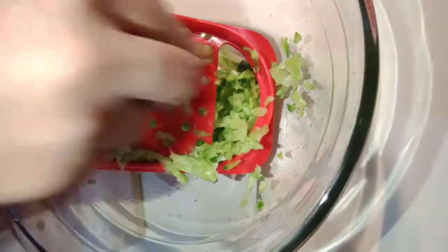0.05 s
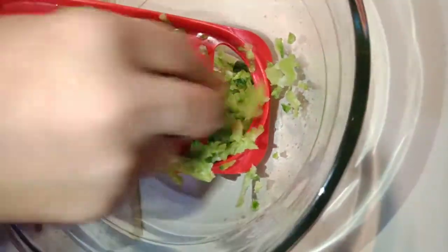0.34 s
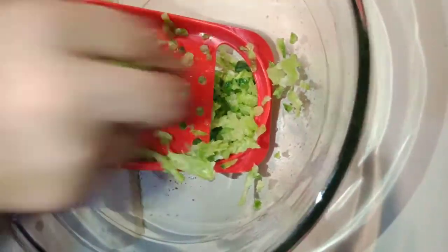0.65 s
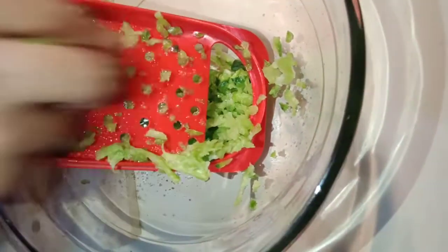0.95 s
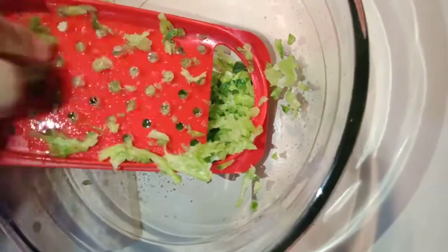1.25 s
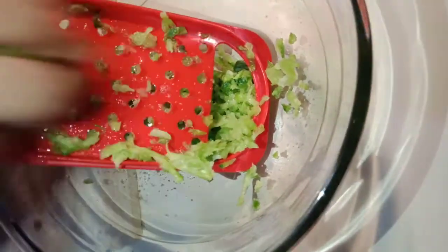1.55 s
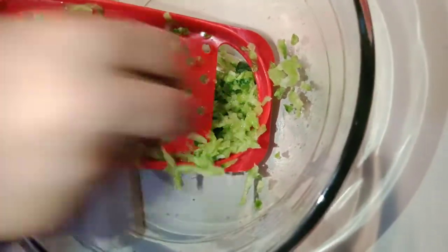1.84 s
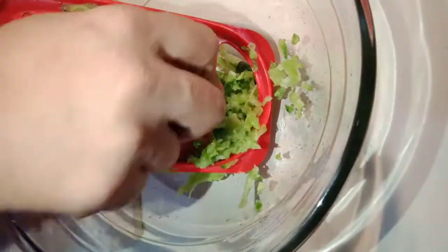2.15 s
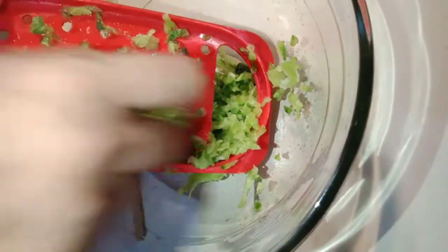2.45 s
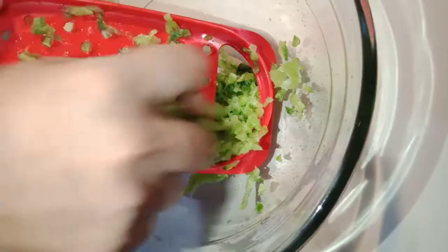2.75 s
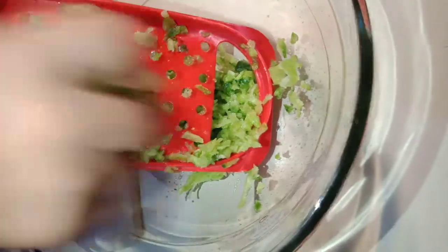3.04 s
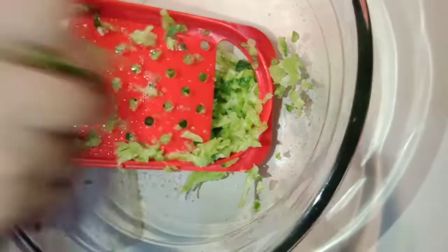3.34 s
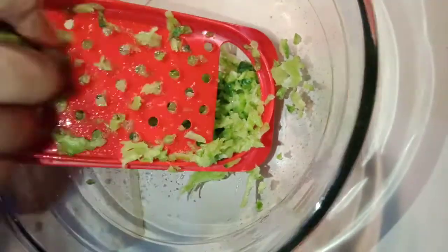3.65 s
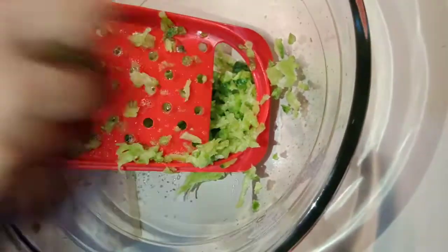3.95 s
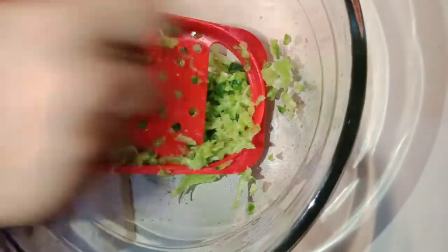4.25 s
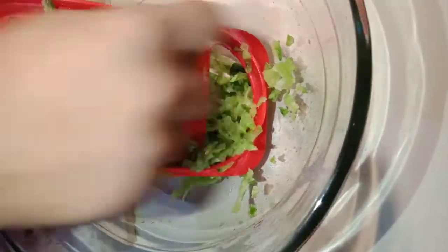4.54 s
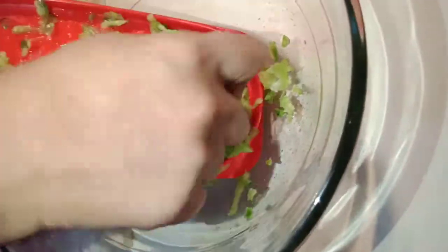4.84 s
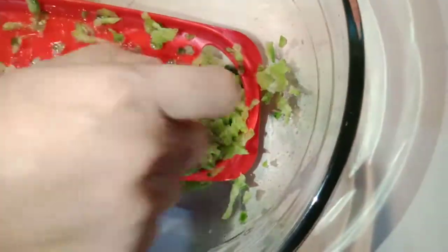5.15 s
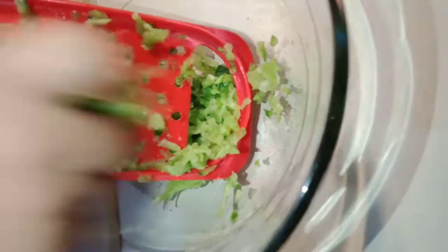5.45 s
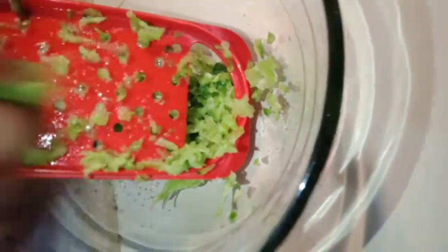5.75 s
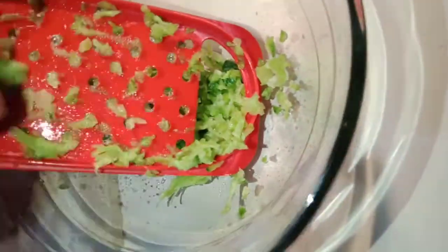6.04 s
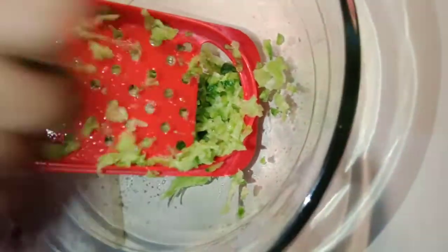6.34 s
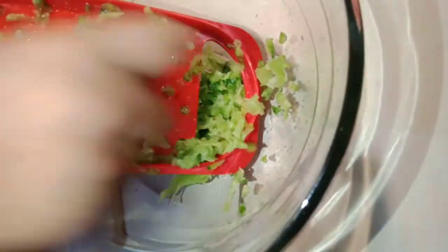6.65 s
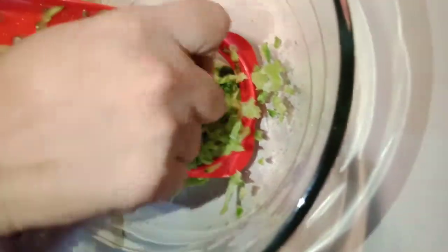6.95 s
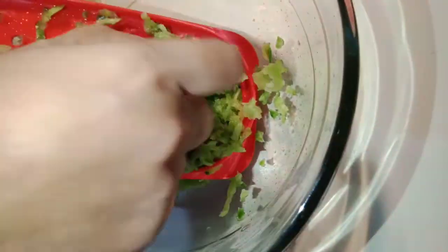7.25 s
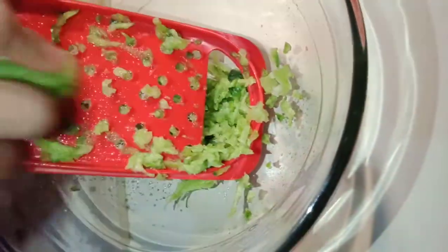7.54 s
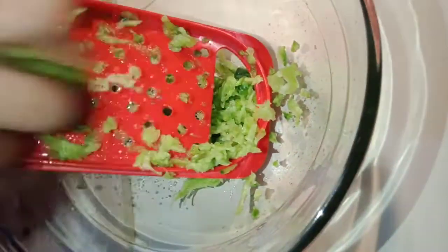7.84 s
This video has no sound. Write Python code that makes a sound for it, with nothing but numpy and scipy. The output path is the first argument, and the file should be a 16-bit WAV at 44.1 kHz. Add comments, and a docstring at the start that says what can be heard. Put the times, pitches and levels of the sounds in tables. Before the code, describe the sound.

A firm vegetable is grated by hand on a coarse plastic grater, about three short strokes a second. Each stroke is a crunchy rasp with a low thud, small snaps and a juicy crackle, followed by a faint wet rub. The grater often clacks against a glass bowl, which rings briefly. The rhythm breaks for three short pauses. The sound is close, in a quiet kitchen.

```python
"""Grating a bitter gourd

A coarse plastic grater lies across a glass bowl in a kitchen. On each push its teeth tear the
flesh in dense, uneven snaps: the plate rasps, thuds in its low bending modes, and juice crackles.
As the gourd is set down again the grater often knocks on the bowl, which rings briefly.
The way back is a faint wet rub."""
import sys
import numpy as np
from scipy import signal
from scipy.fft import rfft, irfft
from scipy.io import wavfile
from scipy.ndimage import uniform_filter1d

SR = 44100
rng = np.random.default_rng(int(sys.argv[2]) if len(sys.argv) > 2 else 0)


def inscribe(sig):
    """Save sig as 16-bit PCM at rate SR to the path in sys.argv[1].

    A 1-D sig is mono; a 2-D sig holds one channel per row.
    Samples are clipped to [-1, 1] before scaling.
    """
    pcm = np.round(np.clip(np.atleast_2d(sig).T, -1, 1) * 32767)
    wavfile.write(sys.argv[1], SR, pcm.astype(np.int16))


N = 353234

# Event levels are relative; each layer adds its own gain.
# pushes across the teeth: start_s, length_s, crest_fraction, rasp_db, crunch_db, thud_db, slide_db
PUSHES = [(-0.116, 0.13, 0.62, -27.0, -28, -22, -55.5), (0.243, 0.14, 0.62, -27.0, -29, -21.0, -46),
          (0.589, 0.14, 0.61, -27.5, -30, -21.0, -48.5), (0.938, 0.12, 0.82, -27.5, -30.0, -23, -48),
          (1.296, 0.139, 0.64, -27.5, -30.5, -20, -48), (1.659, 0.13, 0.59, -26.5, -28.5, -21, -52),
          (1.998, 0.141, 0.4, -27.5, -28.5, -22.5, -41), (2.642, 0.15, 0.51, -29.0, -32, -27, -50.5),
          (3.001, 0.14, 0.58, -27.0, -28.0, -22.5, -52.5), (3.349, 0.14, 0.51, -28, -29, -21, -55.5),
          (3.7, 0.14, 0.6, -29, -32, -26.5, -46), (4.048, 0.13, 0.63, -27.5, -29.5, -23.5, -46),
          (4.393, 0.12, 0.47, -30.0, -29.5, -24.0, -49.5), (4.74, 0.11, 0.59, -26.0, -26.0, -22, -40.5),
          (5.4, 0.14, 0.54, -31.0, -33.0, -28, -45), (5.773, 0.12, 0.5, -29.0, -27.0, -22, -47),
          (6.111, 0.14, 0.57, -29, -28.5, -22.5, -52.5), (6.463, 0.14, 0.65, -29.5, -29.5, -22, -45.5),
          (6.804, 0.12, 0.41, -29, -28.0, -22, -48.5), (7.592, 0.14, 0.4, -35.5, -37, -33.5, -48.5),
          (7.96, 0.12, 0.54, -31, -32.0, -22, -50.0)]
# grater hits bowl: start_s, level_db, clack_offset_db, hardness_db_per_octave
KNOCKS = [(0.12, -34, 6, -3), (1.288, -20, 1.5, -11), (1.634, -20, 7.5, 6), (1.639, -3.5, -4, 0),
          (1.978, -21.5, 3.5, -3), (2.613, -30.5, 4.5, -2), (2.63, -21, 2.5, -2), (2.977, -16.5, -1, -1),
          (2.982, -9.5, -0.5, 0.5), (3.324, -5.5, -2.5, -1.5), (3.677, -8.5, -3.5, -3),
          (3.679, -7.5, 2.5, 3), (4.012, -28, 4.5, 2), (4.697, -32.5, 1.5, -4), (5.363, -21.5, 3.5, 2.5),
          (5.732, -31, 8, 3), (6.084, -18, 4.5, 3.5), (6.425, -27, 9.5, 14), (6.429, -18, 4, 4),
          (6.783, -14, 1, 3), (7.539, -17, 0, -1.5), (7.91, -17.5, 2, -1)]
# light touches between pushes: start_s, length_s, level_db
BRUSHES = [(0.202, 0.042, -49.5), (0.536, 0.031, -47.5), (0.899, 0.036, -49), (1.136, 0.027, -50.5),
           (2.38, 0.058, -53), (4.34, 0.025, -54.0), (4.677, 0.036, -50.5), (5.006, 0.04, -52.5),
           (5.106, 0.064, -53.5), (5.698, 0.047, -43.5), (7.026, 0.075, -51), (7.279, 0.039, -49),
           (7.47, 0.048, -44), (7.549, 0.048, -55), (7.876, 0.11, -49)]
# tough ridges break: start_s, level_db
SNAPS = [(0.256, -11.5), (0.337, -11), (0.586, -14.5), (0.671, -11), (0.979, -13), (1.02, -11),
         (1.373, -14), (1.682, -6), (1.754, -8), (2.094, -9), (2.402, -38), (3.78, -11), (4.055, -21),
         (4.132, -14), (4.755, -17), (4.825, -18), (5.015, -38), (5.401, -28.5), (5.551, -30), (5.812, -15),
         (6.317, -33), (6.522, -9), (6.55, -9), (6.816, -14.5), (7.07, -31.5), (7.468, -29.5), (7.497, -25),
         (7.639, -16), (7.679, -8), (7.721, -18.5), (7.973, -16)]
# wet flesh sticks or lets go: start_s, level_db
TICKS = [(0.3034, -22), (0.8989, -48), (2.4024, -53), (2.4264, -55), (4.6857, -41), (5.154, -45),
         (5.3502, -49), (7.071, -38), (7.2314, -54), (7.2634, -51), (7.3672, -54), (7.4684, -37),
         (7.817, -46), (7.8776, -46)]
# hard catches: centre_s, level_db
THUMPS = [(0.31, -19), (0.64, -16.5), (1.70, -20), (1.762, -20.5), (2.788, -23.5), (3.009, -22),
          (3.446, -21), (4.829, -15), (5.45, -23), (5.805, -17.5), (6.155, -20.5), (6.254, -21)]

# response to the hand: swell_db, rise_db_per_s, fall_db_per_s, lag_s, light_touch_db, fade_db_per_s
RASP_ENVELOPE = (6, 940.5, 401, 0.0, -0.5, 105)
CRUNCH_ENVELOPE = (11.5, 550.5, 526, 0, -3.5, 101)
THUD_ENVELOPE = (8.5, 779.5, 421, .003, -2.5, 65)
JUICE_ENVELOPE = (8.5, 941, 332, -.001, -20, 127.5)

# spectral shapes: frequency_hz, relative_db
CRUNCH_SPECTRUM = [(120, -35), (240, -8), (310, -5), (420, -3), (560, 2), (700, 0.5), (850, -2),
                   (1150, -11.5), (1600, -18.5), (4000, -51.5)]
RASP_SPECTRUM = [(350, -41), (800, -9.5), (1150, 1), (1500, -1), (2400, 2), (3700, -7), (4400, -10.5),
                 (4900, -20.5), (5600, -27.5), (9000, -41), (16000, -45.5)]
JUICE_SPECTRUM = [(800, -19), (3000, -9), (4700, 6.5), (5500, 4), (6500, 1), (7600, -4.5), (8500, -0.5),
                  (10000, -12.5), (12500, -17), (15800, -8)]
THUD_SPECTRUM = [(20, -42), (42, -45.5), (70, -12.5), (95, -3.5), (115, 3.5), (140, 1), (180, -2.5),
                 (225, -2.5), (270, -27), (400, -49), (1000, -79)]
CRACK_SPECTRUM = [(40, -27), (100, -8), (300, -5), (600, 4.5), (1500, 3.5), (2400, -0.5), (4400, -15),
                  (5500, -26.5), (9000, -21.5), (12000, -35), (16000, -37)]
ROOM_SPECTRUM = [(20, -25), (50, -8.5), (120, 1.5), (200, 0.5), (350, -4), (600, -21), (850, -26.5),
                 (2200, -19.5), (3500, -28), (5000, -42), (10000, -57), (16000, -66)]

# peaks and dips of the grater on the bowl: centre_hz, width_hz, boost_db
GRATER_RESONANCES = [(323.3, 42, 8), (628.4, 112, 7), (738, 39, 3), (944, 90, 4.5), (1090, 64, -2.5),
                     (1231, 130, 5), (1368, 60, 5), (1580, 230, 0.5), (2013, 82, 5.5), (2330, 140, -2.5),
                     (2860, 490, -5.5), (3153, 100, 8.5), (3394, 160, 6), (4350, 280, 5.5)]
# low bending modes of the plate: centre_hz, width_hz, boost_db
BENDING_MODES = [(88, 14, 1.5), (112.5, 13, 3), (134, 13, 3.5), (187, 16, 2.5), (221, 22, 2.5)]
# slow modes of the glass: pitch_hz, gain_db, t60_s
HUM_MODES = [(1085, -11.5, .8), (2050, -11.5, 0.58)]
# struck plastic plate: pitch_hz, level_db, t60_s
PLATE_MODES = [(129, -24, 0.11), (205, -12, 0.099), (470, -25.5, 0.1), (614, -13.5, 0.027),
               (820, -18.5, 0.025), (1306, -20, 0.051), (1375, -7.5, .03), (1500, -2, 0.016),
               (1754, -9, 0.02), (2390, -17.5, 0.0089)]
# struck glass, damped by the grater: pitch_hz, level_db, t60_s
BOWL_MODES = [(2027, -12, 0.12), (2078, -18.5, 0.052), (3155, -14, 0.073), (2965, -36, .06),
              (4400, -20.5, 0.044), (4545, -24.5, 0.031), (6020, -49, 0.06)]
# kitchen echo: frequency_hz, t60_s
ECHO_DECAY = [(100, 0.52), (600, 0.17), (2000, 0.25), (4000, 0.43), (8000, 0.37), (16000, 0.14)]


def from_db(db):
    """Decibels to gain."""
    return 10 ** (np.asarray(db) / 20)


def unit_rms(x):
    """Scale to unit power."""
    return x / np.sqrt(np.mean(x ** 2) + 1e-20)


def at_hz(points, hz):
    """Read a table on a log-frequency axis."""
    table_hz, values = np.transpose(points)
    return np.interp(np.log(np.maximum(hz, 1)), np.log(table_hz), values)


def butter(x, order, edges_hz, kind="low"):
    """Butterworth filter."""
    return signal.sosfilt(signal.butter(order, edges_hz, kind, fs=SR, output="sos"), x)


def drift(rate_hz):
    """Smooth random wander, unit RMS."""
    pole = np.exp(-2 * np.pi * rate_hz / SR)
    return unit_rms(signal.lfilter([1], [1, -2 * pole, pole * pole], rng.standard_normal(N + SR))[SR:])


def response(spectrum, resonances=(), size=8192):
    """Minimum-phase impulse response, unit energy."""
    hz = np.arange(size // 2 + 1) * SR / size
    peaks_db = sum(db / (1 + (2 * (hz - centre) / width) ** 2) for centre, width, db in resonances)
    cepstrum = irfft(np.log(from_db(at_hz(spectrum, hz) + peaks_db)))
    cepstrum[1:size // 2] *= 2
    cepstrum[size // 2 + 1:] = 0
    ir = irfft(np.exp(rfft(cepstrum)))
    return ir / np.sqrt(np.sum(ir ** 2))


def through(force, ir):
    """Convolve with an impulse response."""
    return signal.fftconvolve(force, ir)[:N]


def impulses(times_s, gains):
    """One click at each time."""
    out = np.zeros(N)
    np.add.at(out, np.clip((np.asarray(times_s) * SR).astype(int), 0, N - 1), gains)
    return out


def levelled(x, window_s):
    """Hold running power at one; keep the faster grain."""
    power = uniform_filter1d(x ** 2, max(int(window_s * SR), 8))
    return x / np.sqrt(np.maximum(power, 1e-9))


def grains(per_s, spread_db):
    """Cells burst at random: many small, a few large."""
    sizes = from_db(spread_db * np.minimum(rng.exponential(1, N), 4.5))
    return unit_rms(sizes * rng.choice([-1, 1], N) * (rng.random(N) < per_s / SR))


def bursts(events, ir, crumble_db, crumble_s):
    """Each break: a sharp click, then short crumbling."""
    start_s, level_db = np.transpose(events)
    clicks = impulses(start_s, from_db(level_db))
    fade = np.exp(-np.arange(SR // 10) / (crumble_s * SR))
    crumbs = through(clicks, fade / np.sqrt(np.sum(fade ** 2))) * rng.standard_normal(N)
    return through(clicks + from_db(crumble_db) * crumbs, ir / np.abs(ir).max())


def contact_db(peaks_db, envelope):
    """Pushes and brushes bite, swell and let go; a fading slide follows each push."""
    swell_db, rise_db_per_s, fall_db_per_s, lag_s, light_touch_db, fade_db_per_s = envelope
    t = np.arange(0, N, 32) / SR - lag_s

    def flanks(start_s, end_s, decay_db_per_s):
        return -rise_db_per_s * np.maximum(start_s - t, 0) - decay_db_per_s * np.maximum(t - end_s, 0)

    def arch(start_s, length_s, crest):
        past_crest = np.clip((t - start_s) / length_s, 0, 1) - crest
        sag = (past_crest / np.where(past_crest < 0, crest, 1 - crest)) ** 2
        return flanks(start_s, start_s + length_s, fall_db_per_s) - swell_db * sag

    pushes = [db + arch(*push[:3]) for push, db in zip(PUSHES, peaks_db)]
    slides = [db + light_touch_db + flanks(start_s + length_s, start_s + length_s, fade_db_per_s)
              for start_s, length_s, *_, db in PUSHES]
    brushes = [db + light_touch_db + arch(start_s, length_s, crest=0.36)
               for start_s, length_s, db in BRUSHES]
    power = np.sum(from_db(np.maximum(pushes + slides + brushes, -130)) ** 2, axis=0)
    return np.interp(np.arange(N) / SR - lag_s, t, 10 * np.log10(power))


def gripped_plate(force, spectrum, ripple_db, shift_hz):
    """The hand travels over the plate, so its fine resonances keep changing in strength."""
    pulls = np.array([np.exp(3 * drift(shift_hz)) for _ in range(7)])
    out = 0
    for share in pulls / pulls.sum(axis=0):
        fine = [(hz, 35 + hz / 60, ripple_db * rng.uniform(-1.1, 1))
                for hz in np.geomspace(450, 9000, 72)]
        out += through(force * share, response(spectrum, GRATER_RESONANCES + fine))
    return out


def plate_rasp(force, level_db):
    """Cut flesh rasps; flesh that only slides gives a duller rub."""
    rasp = gripped_plate(force * from_db(level_db + 1.12), RASP_SPECTRUM, ripple_db=6.5, shift_hz=10.1)
    rub = signal.sosfiltfilt(signal.butter(5, 3950, fs=SR, output="sos"), rasp)   # zero phase
    cutting = np.clip((level_db + 56) / 24, 0, 1)
    return cutting * rasp + (1 - cutting) * rub


def juice_crackle(spray, level_db):
    """Juice sprays; lone bubbles pop."""
    bubbles = grains(per_s=70, spread_db=1.5)
    force = spray * from_db(level_db + 2.5) + bubbles * from_db(level_db - 10)
    return through(force, response(JUICE_SPECTRUM))


def plate_thud(tearing, level_db, thump_width_s=0.013):
    """Tearing bends the plate; hard catches make it thump."""
    t = np.arange(N) / SR
    thump_power = sum(from_db(db) ** 2 / (1 + ((t - centre_s) / thump_width_s) ** 2) ** 4
                      for centre_s, db in THUMPS)
    bending = levelled(through(tearing, response(THUD_SPECTRUM, BENDING_MODES)), window_s=0.04)
    return bending * np.sqrt(from_db(level_db - 0.4) ** 2 + thump_power)


def grating(ridge_hz=22):
    """Teeth catch and let go many times a push; each catch tears a clump of cells."""
    rasp_peaks_db, crunch_peaks_db, thud_peaks_db = np.transpose(PUSHES)[3:6]
    ridges_db = 1.5 * drift(ridge_hz)   # warty skin: uneven load
    rasp_db = contact_db(rasp_peaks_db, RASP_ENVELOPE) + ridges_db
    crunch_db = contact_db(crunch_peaks_db, CRUNCH_ENVELOPE) + ridges_db + 1.58
    juice_db = contact_db(rasp_peaks_db - 16, JUICE_ENVELOPE) + ridges_db
    thud_db = contact_db(thud_peaks_db, THUD_ENVELOPE) + 1.8 * drift(ridge_hz)
    catching = drift(rate_hz=80)
    bite = from_db(0.35 * (rasp_db - rasp_db.max()))   # a light touch tears fewer cells
    tearing = levelled(grains(per_s=7000 * bite, spread_db=3) * from_db(3.2 * catching), window_s=0.024)
    spray = levelled(grains(per_s=8000 * bite, spread_db=0.5) * from_db(1.9 * catching), window_s=0.029)
    crunch = gripped_plate(tearing * from_db(crunch_db), CRUNCH_SPECTRUM, ripple_db=3.5, shift_hz=6.3)
    rasp = plate_rasp(0.79 * tearing + 0.59 * spray, rasp_db)
    juice = juice_crackle(spray, juice_db)
    body = butter(crunch + plate_thud(tearing, thud_db), 3, 57, "high")   # no deep bass below the thud
    return body + rasp + juice


def bowl_hum(drive):
    """The glass sings faintly with the scraping."""
    out = np.zeros(N)
    for hz, gain_db, t60_s in HUM_MODES:
        radius = from_db(-60 / (t60_s * SR))
        feedforward = np.array([1, 0, -1]) * (1 - radius ** 2) / 2
        feedback = [1, -2 * radius * np.cos(2 * np.pi * hz / SR), radius ** 2]
        out += from_db(gain_db) * signal.lfilter(feedforward, feedback, drive)
    return out


def kitchen_echo(direct, wet_db, first_echo_s):
    """Diffuse, slightly dull echo off hard walls; each octave has its own decay."""
    t = np.arange(SR * 3 // 4) / SR
    edges_hz = np.geomspace(60, 16000, 9)
    tail = 0
    for low_hz, high_hz in zip(edges_hz, edges_hz[1:]):
        band = butter(rng.standard_normal(len(t)), 2, [low_hz, high_hz], "band")
        t60_s = at_hz(ECHO_DECAY, np.sqrt(low_hz * high_hz))
        tail += band * from_db(-60 * t / t60_s)
    tail *= t > first_echo_s
    tail /= np.sqrt(np.sum(tail ** 2))
    return butter(through(direct, from_db(wet_db) * tail), 2, 6000)


def room_tone(level_db):
    """Steady low background noise."""
    return from_db(level_db) * through(rng.standard_normal(N), response(ROOM_SPECTRUM))


def struck(start_s, level_db, tilt_db_per_octave, modes, scatter_db, swell_s):
    """Each blow excites all modes, which swell and decay; hard blows favour the upper ones."""
    t = np.arange(int(SR * 0.7)) / SR
    octaves = np.log2([hz / modes[0][0] for hz, _, _ in modes])
    jitter_db = scatter_db * rng.standard_normal((len(start_s), len(modes)))
    strengths = from_db(level_db[:, None] + np.outer(tilt_db_per_octave, octaves) + jitter_db)
    swell = 1 - np.exp(-t / swell_s)
    rings = [swell * from_db(db - 60 * t / t60_s) * np.sin(2 * np.pi * hz * t) for hz, db, t60_s in modes]
    return sum(through(impulses(start_s, gains), ring) for gains, ring in zip(strengths.T, rings))


def bowl_knocks():
    """Plastic clacks and buzzes, the wet gourd splats, the glass rings on."""
    start_s, level_db, clack_offset_db, hardness = np.transpose(KNOCKS)
    clack_db = level_db + clack_offset_db
    splat_db = 0.45 * clack_db - 34
    crack_ir = response(CRACK_SPECTRUM, GRATER_RESONANCES)
    clack = struck(start_s, clack_db, 0, PLATE_MODES, scatter_db=2, swell_s=0.00026)
    buzz = bursts(np.c_[start_s, clack_db], crack_ir, crumble_db=12.5, crumble_s=0.0063)
    splat = bursts(np.c_[start_s, splat_db], response(JUICE_SPECTRUM), crumble_db=6.5, crumble_s=0.015)
    ring = struck(start_s, level_db, hardness, BOWL_MODES, scatter_db=1.5, swell_s=0.0013)
    plastic = butter(from_db(-2.5) * clack + from_db(-17) * buzz, 3, [90, 4500], "band")
    return plastic + splat + from_db(2.5) * ring


def flesh_snaps():
    """Tough ridges crack through the plate; wet flesh ticks; loose pulp settles throughout."""
    crack_ir = response(CRACK_SPECTRUM, GRATER_RESONANCES)
    cracks = bursts(SNAPS, crack_ir, crumble_db=4, crumble_s=0.0044)
    ticks = bursts(TICKS, response(JUICE_SPECTRUM), crumble_db=4, crumble_s=0.004)
    pulp = through(grains(per_s=18, spread_db=4.5), crack_ir)
    return from_db(-3.5) * cracks + from_db(-1.5) * ticks + from_db(-74) * pulp


def scene():
    """Grater and bowl close by in a quiet kitchen, mono."""
    direct = grating() + flesh_snaps() + bowl_knocks()
    echo = kitchen_echo(direct, wet_db=-19.5, first_echo_s=0.001)
    return (direct + bowl_hum(direct) + echo + room_tone(level_db=-52.5))[None]


def record(dry):
    """Steep low-pass at 15.9 kHz."""
    return signal.sosfilt(signal.ellip(12, 0.1, 80, 15900, fs=SR, output="sos"), dry)


dry = scene()
out = record(dry)
inscribe(out)
```